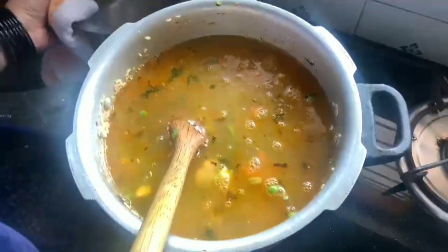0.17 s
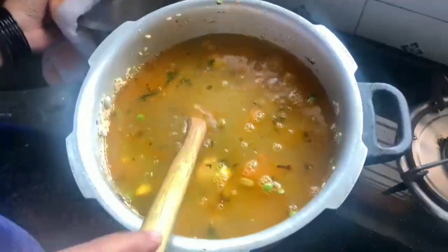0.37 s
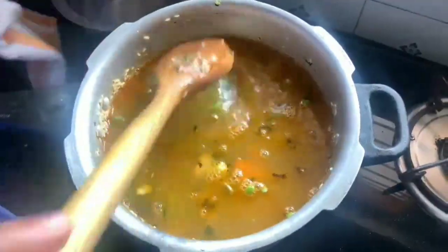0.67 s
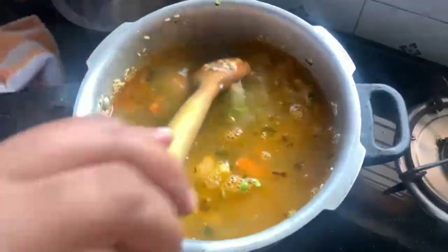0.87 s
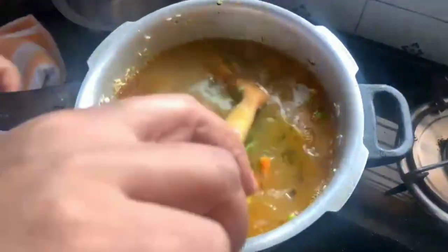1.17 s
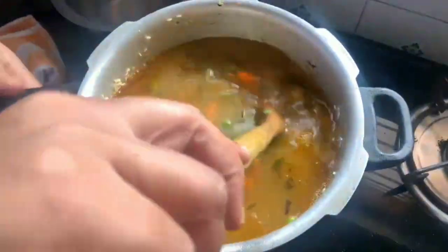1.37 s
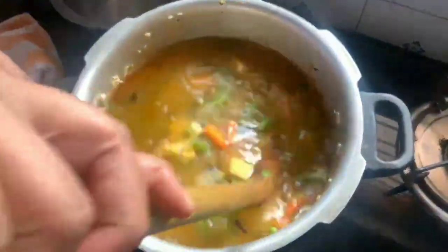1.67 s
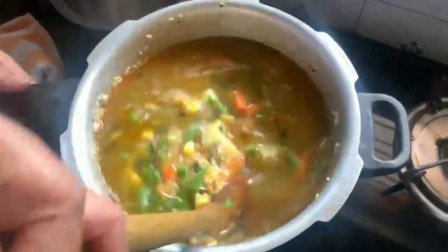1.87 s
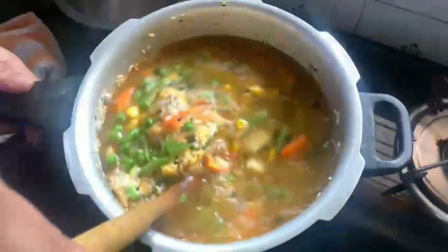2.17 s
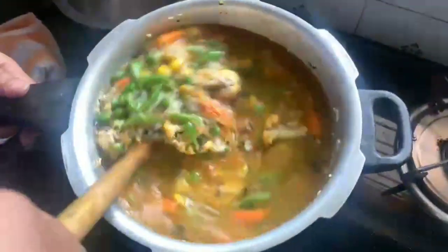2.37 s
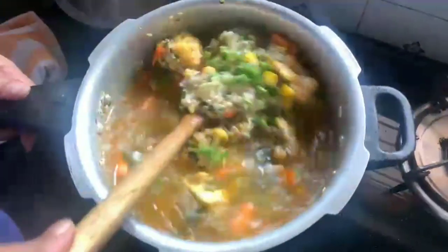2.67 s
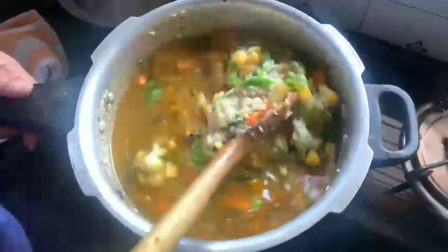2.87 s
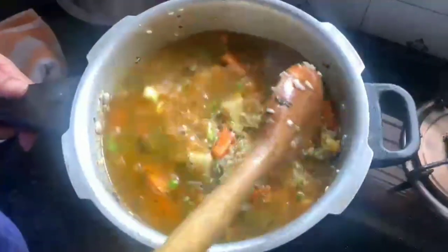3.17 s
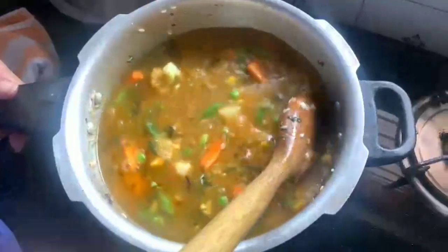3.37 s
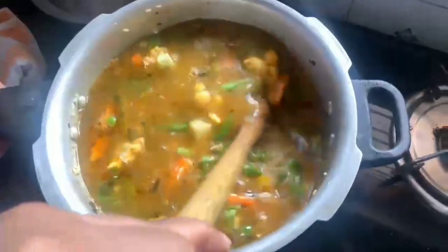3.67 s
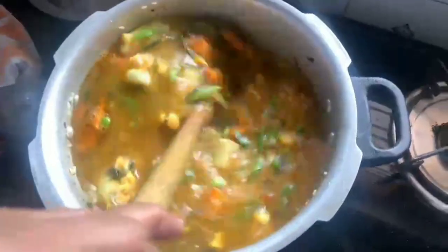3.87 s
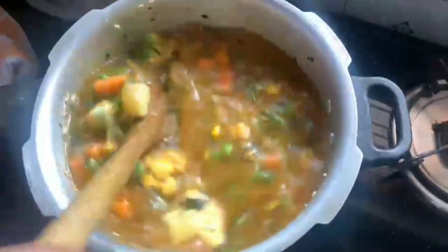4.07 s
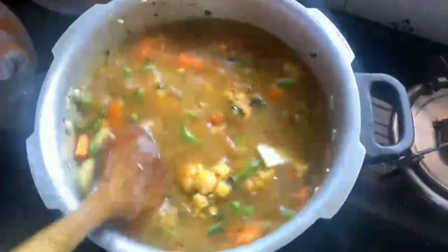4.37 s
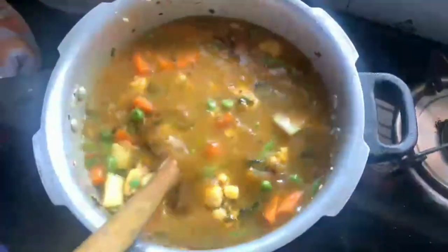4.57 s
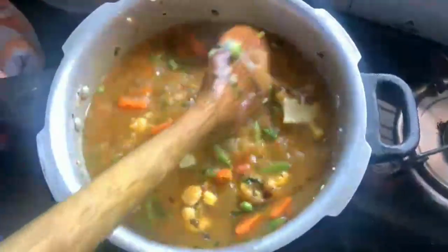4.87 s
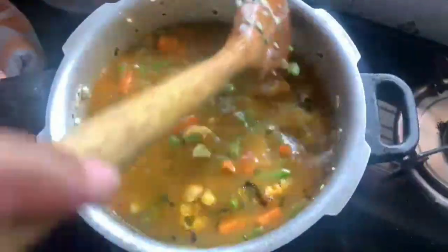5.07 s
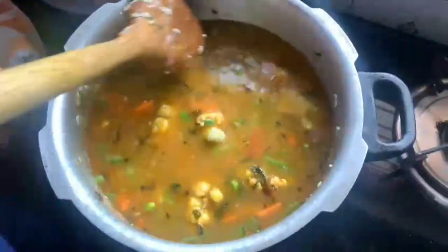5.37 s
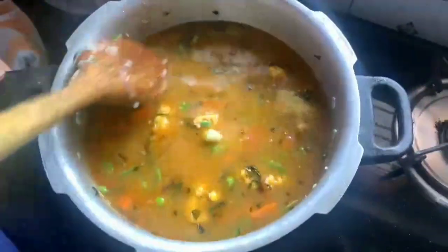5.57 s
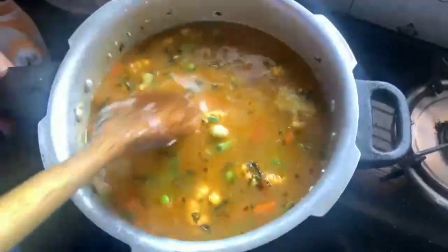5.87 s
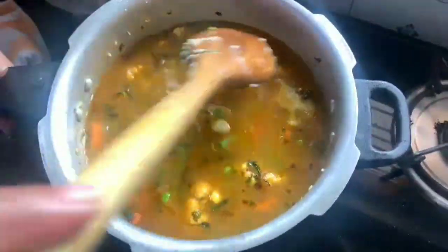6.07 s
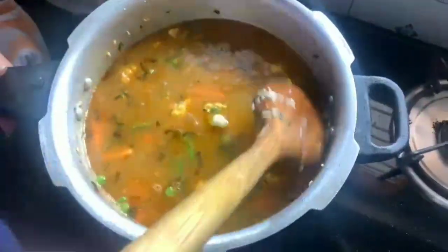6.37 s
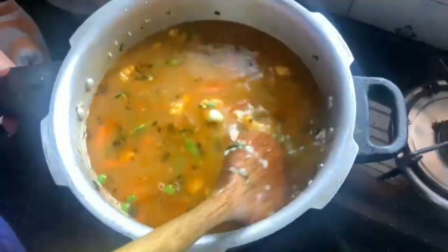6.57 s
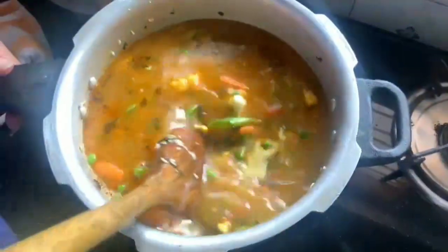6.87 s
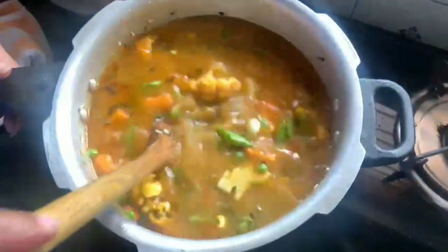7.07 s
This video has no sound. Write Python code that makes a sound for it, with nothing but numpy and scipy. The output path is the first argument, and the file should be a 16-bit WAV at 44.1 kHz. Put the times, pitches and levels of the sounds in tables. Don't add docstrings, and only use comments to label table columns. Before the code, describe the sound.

A metal pot clanks and rings briefly at the start, then a wooden spoon stirs thin rice and vegetable broth. Small drips and faint fizz grow into a busy splash of bright spits and hollow plops around four seconds. Stirring then calms to soft scraping, and a hard wooden rim knock with quick lighter taps comes late. Close phone microphone in a small kitchen, with low motor hum and rumble.

```python
import sys
import numpy as np
from scipy import signal
from scipy.fft import rfft, irfft, next_fast_len
from scipy.io import wavfile
from scipy.ndimage import uniform_filter1d, map_coordinates

SR = 44100
rng = np.random.default_rng(int(sys.argv[2]) if len(sys.argv) > 2 else 0)


def int16_out(signal):
    q = np.round(np.clip(np.atleast_2d(signal).T, -1, 1) * 32767)
    wavfile.write(sys.argv[1], SR, q.astype(np.int16))


def rack_gain(trim_db):
    fader = np.asarray(trim_db, float)
    return 10 ** (fader / 20)


N = 318798

# start_s, peak_db, centre_hz, body_db
BIG_DROPS = [(0.717, -42, 6100, 4), (0.7204, -56, 7400, 12), (1.085, -44.5, 6700, -5),
             (1.9821, -46.5, 5900, 0), (2.465, -48, 4830, 10.5), (2.4786, -29, 5350, -5),
             (2.4801, -28.5, 10500, -2.5), (2.679, -38.5, 4100, -9), (2.92, -46, 5330, -9),
             (2.826, -35.5, 8700, -23), (3.3659, -31.5, 11400, -34), (3.745, -27, 9400, -19),
             (3.7738, -24.5, 10000, -9), (3.917, -36, 8500, -6), (3.9339, -22, 9800, -6),
             (3.941, -31, 6080, -17), (3.9513, -42.5, 6600, 12), (4.0179, -28, 8400, 0),
             (4.051, -38, 7400, -3), (4.062, -28, 8000, -10), (4.1793, -32.5, 10600, -18),
             (4.217, -35, 7700, -16), (6.3316, -36.5, 6400, 4.5), (6.6028, -52.5, 7360, -10)]
# start_s, peak_db, centre_hz, body_db, half_length_ms
SHEETS = [
    (0.474, -43.5, 9600, -1, 3.6),
    (0.831, -31.5, 7300, -9.5, 3.2),
    (3.741, -29.5, 9100, 0, 1.6),
    (3.826, -28.5, 8600, -3.5, 1.9),
    (4.222, -27.5, 9500, -18, 2.1),
    (4.0905, -20, 10200, -12.5, 0.83),
    (3.816, -35, 4300, -5, 1.5),
    (4.109, -32, 8600, -8, 2.5),
]
LIFT_S = 5.2
OPPOSITE = np.array([[1], [-1]])


def unit(x):
    return x / np.sqrt(np.mean(x ** 2) + 1e-20)


def along(points, hz):
    f, v = np.transpose(points)
    return np.interp(np.log(hz + 1), np.log(f + 1), v)


def curves(rows):
    s, *cols = np.transpose(rows)
    return [np.interp(np.arange(N) / SR, s, c) for c in cols]


def wobble(rate):
    steps = np.arange(0, N + 64, 64)
    knots = rng.standard_normal(int(N * 40 / SR) + 4)
    return np.interp(np.arange(N), steps, map_coordinates(knots, [steps * rate / SR]))


def filtered(x, response):
    m = next_fast_len(N + 8192)
    return irfft(rfft(x, m) * response(np.fft.rfftfreq(m, 1 / SR)), m)[..., :N]


def coloured(x, spectrum):
    return unit(filtered(x, lambda hz: rack_gain(along(spectrum, hz))))


def patchy(depth_db):
    z = signal.stft(rng.standard_normal(N), nperseg=512)[2]
    field = uniform_filter1d(rng.standard_normal(z.shape), size=6, axis=0)
    field = uniform_filter1d(field, size=10, axis=1)
    return signal.istft(z * rack_gain(depth_db * unit(field)), nperseg=512)[1][:N]


def crackle(count, spread_db, t60):
    ticks = np.bincount(rng.integers(0, N, count), rack_gain(spread_db * rng.exponential(size=count)), N)
    fading = signal.lfilter([1], [1, -rack_gain(-60 / (t60 * SR))], ticks)
    return fading * rng.standard_normal(N)


def burst(shape, response):
    noise = shape * rng.standard_normal(len(shape))
    out = irfft(rfft(noise) * response(np.fft.rfftfreq(len(shape), 1 / SR) + 1), len(shape))
    return out / np.sqrt(np.max(uniform_filter1d(out ** 2, size=40)))


def ring(modes, t, scatter_db):
    hz, db, t60 = np.transpose(modes)[:, :, None]
    luck = rng.standard_normal((2, len(hz), 1))
    fade = rack_gain(db + scatter_db * luck[0] - 60 * t / t60)
    return np.sum(fade * np.sin(2 * np.pi * hz * t + .5 * luck[1]), axis=0)


def add(track, s, sound):
    start = round(s * SR)
    part = track[..., max(start, 0):][..., :sound.shape[-1] + min(start, 0)]
    part += sound[..., max(-start, 0):][..., :part.shape[-1]]


def churning():
    # start_s, level_db
    effort = [(0.0, -60), (0.25, -68.5), (0.6, -75), (0.95, -71.5), (1.3, -81.5), (1.8, -70.5), (2.15, -69),
              (2.6, -65.5), (2.8, -60.5), (3.5, -65.5), (3.72, -74.5), (4.1, -62), (4.45, -65.5),
              (4.75, -72.5), (5.14, -77.5), (5.3, -63.5), (5.82, -68), (5.9, -80)]
    return curves(effort)[0]


def spits():
    chirp_db, chirp_t60_s = -7, .012
    apart_s = 6e-5
    out, t = np.zeros((2, N)), np.arange(-256, 1792) / SR
    after = np.maximum(t, 0)
    spray = (t > 0) * rack_gain(-60 * after / 0.018)
    for s, db, hz, body_db, *half_ms in BIG_DROPS + SHEETS + droplets(count=70):
        tear = np.exp(-(1000 * t / max(half_ms + [0.6])) ** 2)
        bright = burst(tear + 0.062 * spray, lambda f: rack_gain(-18 * np.log2(f / hz) ** 2))
        body = burst(tear + 0.18 * spray, lambda f: rack_gain(-11 * np.log2(f / 2700) ** 2))
        chirp_hz = min(hz, 10500) * np.exp(.12 * rng.standard_normal())
        chirp = np.sin(2 * np.pi * chirp_hz * after * (1 + 4 * after))
        bright = bright + rack_gain(chirp_db - 60 * after / chirp_t60_s) * chirp
        apart = apart_s * rng.standard_normal()
        for port, lag in zip(out, (apart, -apart)):
            add(port, s + t[0] + lag, rack_gain(db + body_db - 7.0) * body)
        add(out, s + t[0], rack_gain(db - 3.0) * bright)
    return out


def droplets(count):
    # start_s, peak_db, centre_hz
    drips = [(1.025, -48, 5390), (1.1871, -49.5, 7700), (1.5265, -49, 8400), (1.7011, -46.5, 10400),
             (1.7997, -47.5, 8680), (1.8997, -44.5, 9600), (2.2227, -44, 9400), (2.3532, -45, 8600),
             (2.4469, -42, 8100), (2.6151, -43, 9640), (2.6595, -43, 7950), (2.8131, -36, 7700),
             (2.8997, -43, 9510), (3.0057, -39, 10370), (3.1119, -34, 10100), (3.1528, -38.5, 9040),
             (3.286, -44.5, 7180), (3.3429, -42.5, 10140), (3.8902, -43, 9000), (4.0094, -34, 6700),
             (4.1306, -39, 7900), (4.2511, -42, 7504), (4.3521, -65, 9200), (4.3756, -42, 10200),
             (4.4077, -43, 6900), (4.4751, -41.5, 5940), (4.8442, -47, 7250), (5.0627, -53, 10500),
             (5.0894, -39.5, 10900), (5.1727, -47, 11200)]
    # start_s, peak_db, centre_hz
    trickle = [(0.608, -58, 10000), (0.811, -51, 6510), (0.92, -51, 10500), (0.975, -58, 11060),
               (2.87, -45, 6170), (2.923, -47, 5570), (3.56, -51, 11000), (4.192, -45, 10870),
               (4.317, -49, 6650), (4.436, -45, 11000), (4.504, -41.5, 10520), (4.549, -50, 6550),
               (4.609, -50, 11030), (4.64, -49, 11000), (4.679, -50, 10800), (4.797, -50, 11270),
               (4.897, -43, 10600), (4.941, -52, 8000), (4.974, -47, 11000), (4.993, -48, 10210),
               (5.079, -55, 10490), (4.35, -51, 9800), (4.398, -54, 7500), (4.345, -62, 7500),
               (0.882, -50, 5170), (4.853, -56, 10200)]
    speck_db, calm_db = 11, -74
    speck_hz, speck_spread = 9000, .2
    body_db = -11.5
    when = LIFT_S * rng.random(count)
    churn_db = churning()[(when * SR).astype(int)]
    size_db = churn_db + speck_db + 3 * rng.standard_normal(count) - 60 * (churn_db < calm_db)
    specks = np.c_[when, size_db, speck_hz * np.exp(speck_spread * rng.standard_normal(count))]
    drops = np.r_[drips, trickle, specks]
    return np.c_[drops, body_db + 2.5 * rng.standard_normal(len(drops))].tolist()


def plops():
    # start_s, peak_db, pitch_hz, cycles to fade 60 dB
    bubbles = [(0.717, -34.5, 1905, 31), (0.829, -25, 4670, 24), (0.83, -35, 2480, 22),
               (0.699, -58, 1840, 30), (1.525, -48, 680, 23), (2.464, -27, 980, 4.5), (2.539, -51, 640, 31),
               (2.956, -39, 1170, 11), (3.106, -39.5, 900, 9.5), (3.4886, -32, 3152, 33),
               (3.697, -41, 3040, 25), (0.485, -45.5, 4590, 90), (0.725, -52, 2045, 200),
               (3.7395, -29, 2080, 15), (3.7733, -24.5, 780, 8), (3.785, -40, 650, 16),
               (3.8152, -24.5, 3580, 21), (3.837, -28, 3680, 20), (3.846, -39, 950, 9),
               (3.825, -23, 3640, 27), (3.8535, -37, 1210, 17), (3.916, -32, 3420, 27),
               (3.9335, -23.5, 1700, 12.5), (3.987, -39, 1588, 19), (4.0185, -23, 920, 17),
               (4.045, -30.5, 875, 13), (4.05, -40, 2700, 14), (4.093, -43, 2800, 16),
               (4.096, -34.5, 1981, 25), (4.108, -32, 1850, 16), (3.762, -44, 3800, 30),
               (3.887, -36, 2960, 25), (3.953, -42, 3590, 28), (4.082, -28, 2440, 18),
               (4.145, -36.5, 1434, 22), (4.216, -43, 1890, 35)]
    out, t = np.zeros(N), np.arange(SR // 8) / SR
    for s, db, hz, cycles in bubbles:
        t60 = cycles / hz
        bubble = np.sin(2 * np.pi * hz * (t + 0.038 * t * t / t60)) * (1 - np.exp(-t / 0.00049))
        add(out, s, rack_gain(db + 2.0 - 60 * t / t60) * bubble)
    return out


def stirring():
    rice_db, rice_grows = -71, 1.63
    churn_db = churning()
    flurry = rack_gain(3 * wobble(38))
    froth = froth_left()
    foam = (rack_gain(churn_db) + froth) * fizz(flurry)
    carried = rack_gain(rice_db + rice_grows * (churn_db + 70))
    rub = rice_hiss(flurry)
    pressed, pressure = wall_strokes(rub)
    bubbles = rack_gain(4) * (pressure + carried) * gurgle(count=900)
    rice = rack_gain(-10.0) * ((carried + 0.5 * froth) * rub + 0.57 * pressed)
    return foam + bubbles + rice + squeaks()


def froth_left():
    froth, t = np.zeros(N), np.arange(SR // 2) / SR
    for s, db, *_ in BIG_DROPS + SHEETS:
        add(froth, s, rack_gain(db - 23 - 60 * t / .12))
    return froth


def fizz(flurry):
    # pitch_hz, level_db per Hz
    foam_colour = [(3000, -30), (5500, -10), (7200, -5), (8800, 0), (11000, -1), (12500, -10), (15000, -45)]
    stirred = np.arange(N) / SR < LIFT_S
    foam = stirred * unit(crackle(count=2200, spread_db=3.5, t60=.008)) + .55 * unit(patchy(3.5))
    return coloured(flurry * (foam + 0.18 * patchy(4.7) * OPPOSITE), foam_colour)


def rice_hiss(flurry):
    # pitch_hz, level_db per Hz
    rice_colour = [(1200, -24), (2500, -3), (4000, 0), (6500, -2), (8500, -7), (10500, -14), (13000, -40)]
    ticking = np.where(np.arange(N) / SR < LIFT_S, 1, .35)
    rub = ticking * unit(crackle(count=2200, spread_db=3, t60=.012)) + .55 * unit(patchy(5))
    return coloured(np.sqrt(flurry) * (rub + .4 * patchy(4) * OPPOSITE), rice_colour)


def wall_strokes(rub):
    # start_s, length_s, level_db, centre_hz
    strokes = [(-.05, 0.45, -51.5, 4700), (2.221, 0.36, -54.5, 3930), (2.462, 0.25, -58, 3970),
               (2.617, 0.17, -53, 4500), (2.752, 0.1, -37.5, 5490), (2.854, 0.18, -79, 5500),
               (3.078, 0.16, -48, 6040), (3.204, 0.18, -68, 4045), (3.408, 0.19, -53, 3300),
               (3.64, 0.16, -52.5, 2800), (3.72, 0.073, -64, 3504), (3.815, 0.14, -43.5, 3500),
               (3.933, 0.15, -42, 4500), (4.02, 0.12, -41, 5000), (4.11, 0.066, -48, 2800),
               (4.188, 0.062, -31, 4500), (4.255, 0.23, -93, 5800), (4.81, 0.16, -53, 4407),
               (5.214, 0.079, -45, 6210), (5.322, 0.17, -64, 4030), (5.486, 0.16, -50, 4000),
               (5.63, 0.21, -50.5, 5300), (6.29, 0.21, -47, 2500)]
    rise_s, octave_off_db = 0.055, -5
    pressed, pressure = np.zeros((2, N)), np.zeros(N)
    f = np.fft.rfftfreq(SR // 2, 1 / SR) + 1
    for s, length, db, hz in strokes:
        t = np.arange(round(length * SR)) / SR
        stroke = rack_gain(db) * np.clip(np.minimum(t, length - t) / rise_s, 0, 1)
        colour = rack_gain(octave_off_db * np.log2(f / hz) ** 2)
        grains = rub[:, round(abs(s) * SR):][:, :len(t)]
        add(pressed, s, stroke * irfft(rfft(grains, SR // 2) * colour)[:, :len(t)])
        add(pressure, s, stroke)
    return pressed, pressure


def gurgle(count):
    middle_hz, spread, cycles = 4600, .35, 16
    when, pitch = rng.random((count, 1)), rng.standard_normal((count, 1))
    size = rng.exponential(size=(count, 1))
    t, hz = np.arange(400) / SR, np.minimum(middle_hz * np.exp(spread * pitch), 9000)
    age = t * hz / cycles
    rings = rack_gain(3 * size - 13 - 60 * age) * np.sin(2 * np.pi * hz * t * (1 + .1 * age))
    rings = rings * (1 - np.exp(-t / .0006))
    places = (when * N).astype(int) + np.arange(len(t))
    return np.bincount(places.ravel(), rings.ravel(), N)[:N]


def squeaks():
    # start_s, length_s, pitch_hz, level_db
    slides = [
        (1.742, 0.18, 7260, -68),
        (2.676, 0.048, 7200, -57),
    ]
    out = np.zeros(N)
    for s, length, hz, db in slides:
        t = np.arange(round(length * SR)) / SR
        slips = 1 + 5 * uniform_filter1d(rng.standard_normal(SR // 4), size=60)[:len(t)]
        add(out, s, rack_gain(db) * np.hanning(len(t)) * slips * np.sin(2 * np.pi * hz * t))
    return out


def spoon():
    # start_s, peak_db, bright_db, puff_db
    knocks = [
        (6.33, -16.5, -3.5, -6.5),
        (6.424, -43, -16, 9),
        (6.4345, -25, -6.5, -11),
        (6.487, -29, -8.5, -5),
        (6.507, -33, -10.5, -12),
        (6.527, -44, -5, -6),
        (7.198, -37.5, -11.5, -7),
    ]
    # pitch_hz, level_db, t60_s
    wood = [(370, -5, .07), (560, -12, .04), (861, -1, .045), (1280, -14, .02), (1900, -3, .022),
            (2350, -4, .018), (3000, -8, .014)]
    # start_s, level_db, top_hz
    bumps = [
        (1.488, -45, 446),
        (1.526, -42, 850),
        (1.559, -44.5, 650),
        (2.215, -47, 611),
        (2.419, -45.5, 457),
        (2.539, -47, 583),
        (5.196, -44.5, 600.4),
        (5.226, -67, 450),
    ]
    grip = .55
    out, t = np.zeros(N), np.arange(4096) / SR
    puff_shape = rack_gain(-60 * t / 0.023) + 0.055 * rack_gain(-60 * t / 0.32)
    for s, db, bright_db, puff_db in knocks:
        modes = [(hz, level + (bright_db + 6.5) * np.log2(hz / 861), grip * t60) for hz, level, t60 in wood]
        tilt_db = bright_db - 9.5
        puff = burst(puff_shape, lambda f: (f / (f + 350)) ** 2 * rack_gain(tilt_db * np.log2(1 + f / 1500)))
        knock = ring(modes, t, scatter_db=2.0) + rack_gain(puff_db) * puff
        add(out, s, rack_gain(db - 10.0) * knock * (1 - np.exp(-t / 0.000071)))
    for s, db, top_hz in bumps:
        bump = burst(t * rack_gain(-60 * t / 0.073), lambda f: f / (f + 200) / (1 + (f / top_hz) ** 3))
        add(out, s, rack_gain(db) * bump)
    return out


def pot():
    # start_s, level_db, on_pot (0 the lid, 1 the pot)
    clanks = [
        (-.1, -34, 0),
        (.081, -38, 1),
        (.0915, -28.5, 1),
        (.113, -37, 1),
    ]
    # pitch_hz, level_db, t60_s
    pot_modes = [(270, -24, 0.25), (310.1, 4.5, 0.38), (355, 1, 0.19), (506, -7.5, 0.16),
                 (543, -0.5, 0.2), (670, -8.5, 0.38), (777, -6, 0.27), (855, -0.5, 0.27),
                 (940, -14, 0.26), (1010, -11, 0.075), (1110, -24, 0.18), (2024, -37, 0.6),
                 (2140, -25, 0.52), (2290, -30, .5), (5440, -33, 0.32), (1204, -6, 0.36),
                 (1330, -14, 0.36), (1633, -25.5, 0.48), (1730, -41, 0.31), (2186, -20, 0.44),
                 (2510, -32, 0.26), (2735, -18, 0.45), (2823, -13, 0.25), (2960, -35, 0.18),
                 (3250, -35, 0.28), (3380, -13, 0.31), (4150, -22, 0.23), (4300, -30, 0.25),
                 (4650, -19, 0.28), (4830, -25, 0.54), (5520, -35, 0.18), (5010, -16.5, 0.15)]
    # pitch_hz, level_db, t60_s
    lid_modes = [(329, 6, 0.45), (673, -3, 0.4), (865, -14, 1), (1039, -12, 0.63), (3042, -20, 0.35),
                 (3530, -20, .5), (4597, -19, .3), (5297, -12, 0.48), (1360, -8, 0.56), (1570, -20, 0.31),
                 (2173, -1.5, 0.61), (2280, -10.5, 0.71), (2715, -17, 0.66), (3289, -7, 0.66),
                 (4180, -7, 0.3)]
    # pitch_hz, level_db
    rattle = [(150, -30), (280, 16.0), (600, 13.5), (1000, -1.5), (2000, -39), (3500, -44),
              (5000, -19.0), (10000, -10.0), (13000, -59)]
    flutter, flutter_rate, pan_db = .7, 16, .6
    out, rough, t = np.zeros((2, N)), np.zeros((2, N)), np.arange(SR // 2) / SR
    for s, db, on_pot in clanks:
        hz, level_db, t60 = np.transpose(pot_modes if on_pot else lid_modes)[:, :, None]
        luck = rng.standard_normal((2, len(hz), 1))
        knots = rng.standard_normal((len(hz), 40))
        drift = np.array([np.interp(t * flutter_rate, np.arange(len(row)), row) for row in knots])
        unsettled = flutter * np.sqrt(hz / 2000) * (drift - drift[:, :1])
        modes = rack_gain(level_db + luck[0] - 60 * t / t60) * np.sin(2 * np.pi * hz * t + unsettled)
        sides = rack_gain(pan_db * luck[1].T * (hz.T > 450) * OPPOSITE)
        add(out, s, rack_gain(db) * sides @ modes * (1 - np.exp(-t / 0.0012)))
        contact = rng.standard_normal(len(t)) + 0.15 * rng.standard_normal((2, len(t)))
        add(rough, s, rack_gain(db - 3 - 60 * t / 0.45) * contact)
    return out + filtered(rough, lambda hz: rack_gain(along(rattle, hz) - 1.5))


def ports(x, leads):
    # pitch_hz, left over right in dB
    lean = [(250, -0.5), (600, 1), (1200, 6), (2500, 2.5), (5000, -7), (9000, 3.4), (12500, -3)]

    def split(hz):
        half_lean = np.log(rack_gain(along(lean, hz))) / 2
        return np.exp((.5j * along(leads, hz) + half_lean) * OPPOSITE)
    return filtered(x, split)


def echo(x):
    # pitch_hz, t60_s
    dying = [(300, 0.2), (900, .07), (2500, 0.1), (5000, 0.08), (11000, 0.04)]
    hz, t, z = signal.stft(rng.standard_normal((2, SR // 2)), SR, nperseg=256)
    fade = rack_gain(-60 * t / along(dying, hz)[:, None])
    dull = hz / (hz + 900) / (1 + (hz / 4200) ** 2)
    tail = signal.istft(z * fade * dull[:, None], SR, nperseg=256)[1]
    late = np.pad(x, ((0, 0), (90, 0)))
    return signal.fftconvolve(late, tail / np.linalg.norm(tail[0]), axes=1)[:, :N]


def kitchen():
    # start_s, level_db
    sway = [(0.0, -42.5), (0.08, -41.5), (0.34, -50), (0.58, -58), (1.41, -49.5), (2.01, -52), (2.23, -49),
            (2.58, -45.5), (3.08, -52.5), (3.96, -47.5), (4.91, -52.5), (6.3, -50), (7.23, -54.5)]
    # pitch_hz, level_db per Hz
    slosh_colour = [(200, -30), (400, -4), (900, 0), (1600, -3.5), (2600, -16), (3200, -11.5), (6500, -56),
                    (8000, -68)]
    # pitch_hz, level_db per Hz
    mid_colour = [(15, -55), (25, -3), (48, -9), (108, 5), (187, -36), (219, -15.5), (299, -9),
                  (379, -13.5), (431, -23.5), (1720, -31), (8710, -53), (11600, -39), (12900, -75),
                  (16800, -104), (22000, -120)]
    # pitch_hz, level_db per Hz
    side_colour = [(15, -69), (25, -2.5), (103, 2), (208, -9), (307, -6), (431, -81), (709, -42),
                   (1910, -25), (5730, -37.5), (9670, -56), (12900, -71), (16800, -92), (22000, -120)]
    rumble_db, = curves(sway)
    drone = rack_gain(rumble_db - 1.5) * room_rumble()
    mid = rack_gain(-54.0) * opposed(coloured(patchy(4.0), mid_colour))
    side = rack_gain(-62.5) * coloured(patchy(0.58), side_colour)
    lapping_db = rumble_db - 10 + 1.5 * wobble(9)
    waves = np.array([patchy(2.5), patchy(2.5)])
    slosh = rack_gain(lapping_db) * coloured(waves, slosh_colour) / np.sqrt(2)
    mid, side = mid + slosh[0], side + slosh[1]
    return (motor() + drone) * rack_gain([[-.7], [.7]]) + np.array([mid + side, mid - side])


def motor():
    # start_s, shaft_hz, level_db
    shaft = [(0, 64, -63), (.054, 63, -72), (.11, 63, -50), (.25, 63.98, -50), (0.33, 64.3, -72),
             (0.38, 64.6, -59), (0.53, 64, -49.5), (3.43, 61.6, -45), (3.95, 61.27, -57),
             (4.24, 61.24, -44.5), (4.6, 60.87, -65), (5.64, 61.65, -46), (5.93, 60.3, -54.5),
             (6.96, 58.43, -51.5), (7.23, 59, -64)]
    room_mode_hz, room_mode_width_hz = 183.94, 0.69
    shaft_hz, first_db = curves(shaft)
    third_db = -57 - 10 * np.log10(1 + ((3 * shaft_hz - room_mode_hz) / room_mode_width_hz) ** 2)
    turn = 2 * np.pi * np.cumsum(shaft_hz) / SR
    first = rack_gain(first_db + 1.3 * wobble(24)) * np.sin(turn)
    third = rack_gain(third_db + 0.37 * wobble(1.474)) * np.sin(3 * turn + 0.38 * wobble(8.2))
    return np.sqrt(2) * (first + third)


def room_rumble():
    # pitch_hz, width_hz, level_db
    room_modes = [(95.4, 7.3, 5.5), (127.2, 8, -3), (148, 3.8, 0), (178.6, 16.6, 0.5), (265.6, 11, -13.5),
                  (311.2, 12.8, -7.5), (340.5, 4.3, -14)]

    def response(f):
        return sum((-1) ** k * rack_gain(db) * 1j * f * w / (c * c - f * f + 1j * f * w)
                   for k, (c, w, db) in enumerate(room_modes))
    return unit(filtered(rng.standard_normal(N), response))


def opposed(x):
    def response(hz):
        high = .97 * np.exp(-((hz - 8400) / 1250) ** 4)
        low = .7 * np.exp(-((hz - 3150) / 400) ** 2)
        middle = .4 * np.exp(-((hz - 5400) / 400) ** 2)
        return 1 - high - low - middle
    return filtered(x, response)


def scene():
    # pitch_hz, radians by which left leads
    water_leads = [(0, 0), (860, .3), (1300, 1.2), (1700, .3), (3100, 2.8), (3700, 2.3), (4050, 1),
                   (4650, 2.7), (6120, 6.1), (6550, 6.3), (7670, 3.6), (9220, 2.8), (10400, .2),
                   (12600, -1.2)]
    # pitch_hz, radians by which left leads
    rim_leads = [(0, 0), (300, .4), (600, 1), (1200, 1.4), (3000, 1.5), (6000, 1.3), (12600, 1)]
    water, rim = spits() + plops() + stirring(), spoon() + pot()
    direct = ports(water, water_leads) + ports(rim, rim_leads)
    return direct + rack_gain(-9) * echo(water + rim) + kitchen()


def low_pass(x):
    return signal.sosfilt(signal.butter(12, 13040, fs=SR, output="sos"), x)


def record(dry):
    dull = filtered(dry, lambda hz: 1 / (1 + (hz / 11950) ** 80))
    return low_pass(dull)


dry = scene()
out = record(dry)
int16_out(out)
```